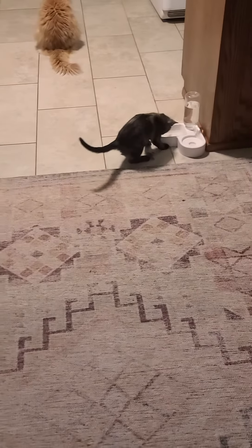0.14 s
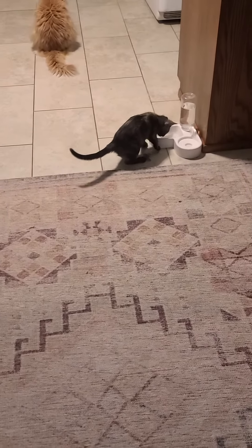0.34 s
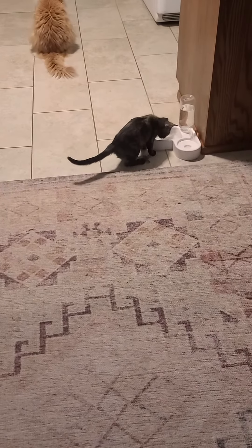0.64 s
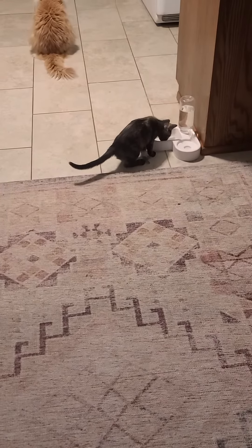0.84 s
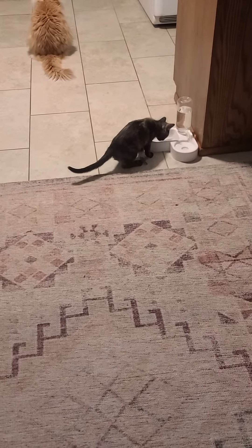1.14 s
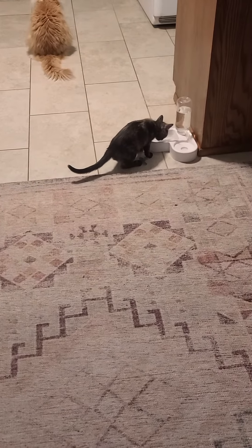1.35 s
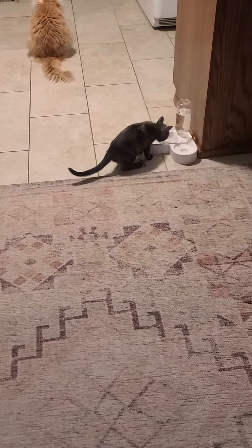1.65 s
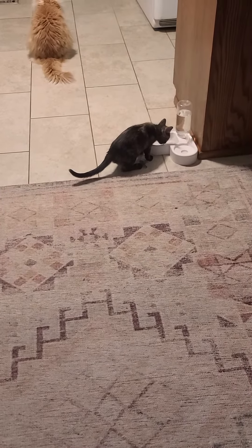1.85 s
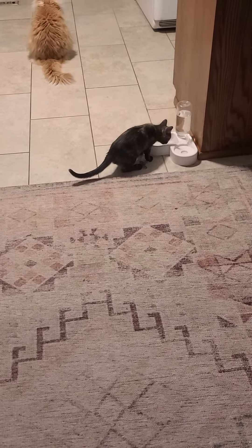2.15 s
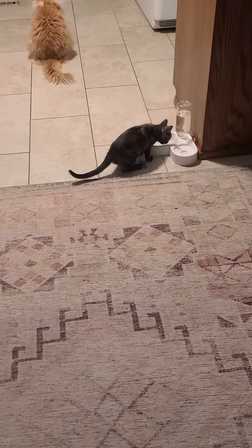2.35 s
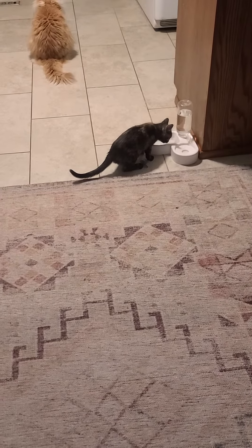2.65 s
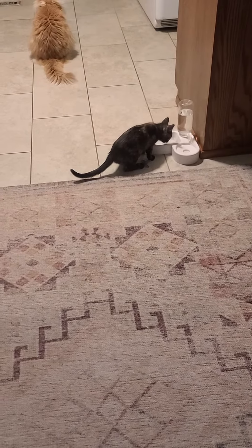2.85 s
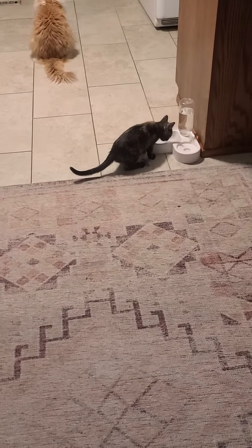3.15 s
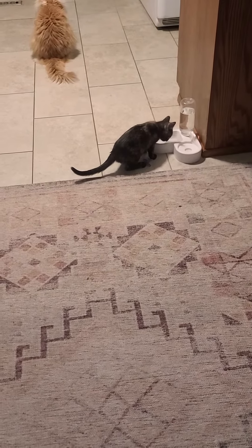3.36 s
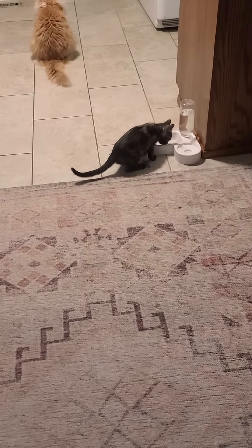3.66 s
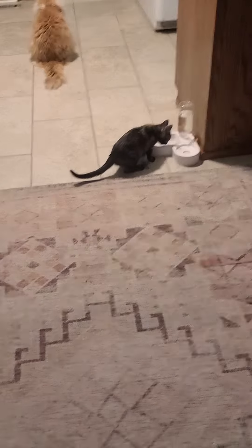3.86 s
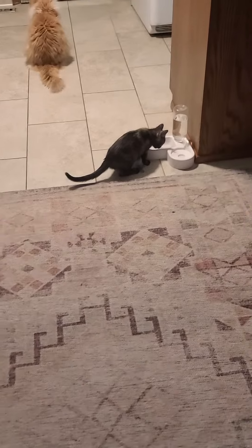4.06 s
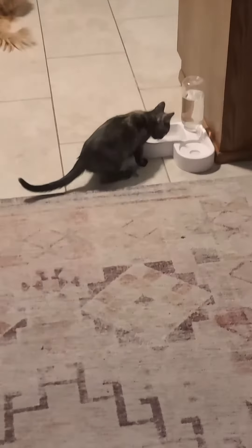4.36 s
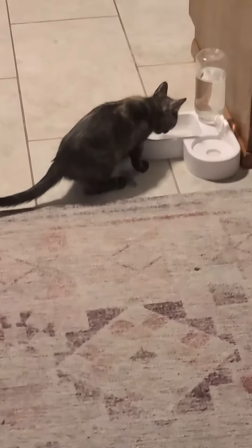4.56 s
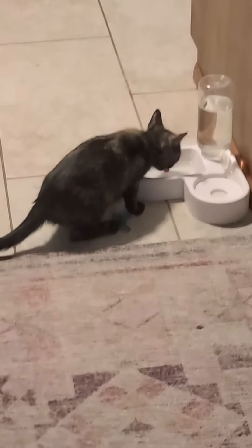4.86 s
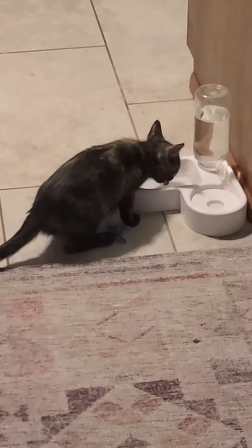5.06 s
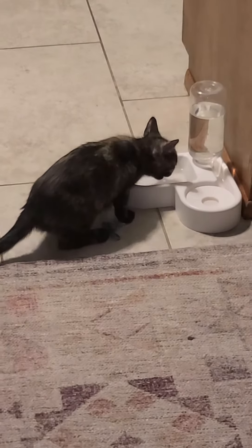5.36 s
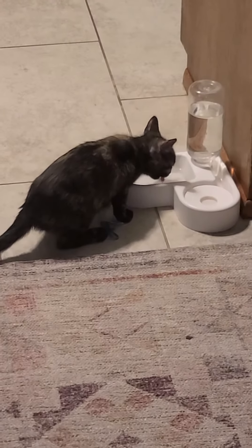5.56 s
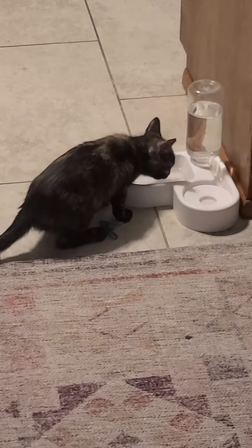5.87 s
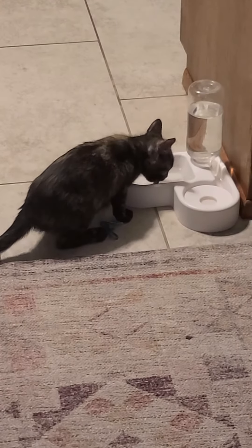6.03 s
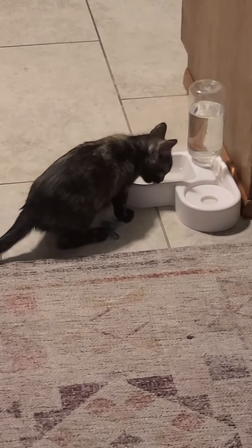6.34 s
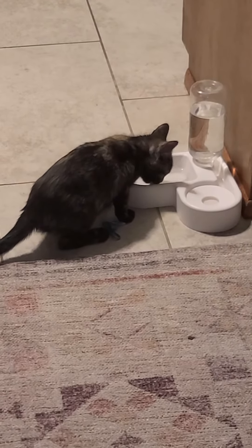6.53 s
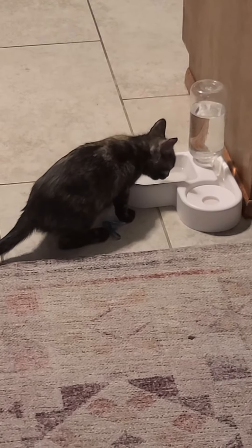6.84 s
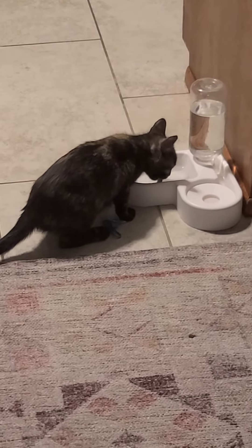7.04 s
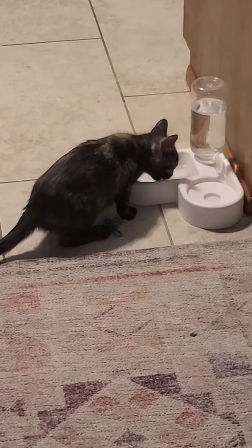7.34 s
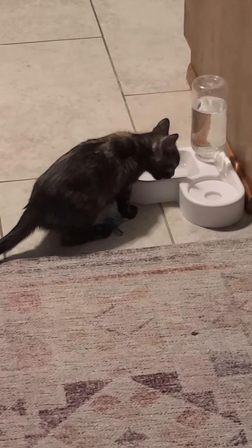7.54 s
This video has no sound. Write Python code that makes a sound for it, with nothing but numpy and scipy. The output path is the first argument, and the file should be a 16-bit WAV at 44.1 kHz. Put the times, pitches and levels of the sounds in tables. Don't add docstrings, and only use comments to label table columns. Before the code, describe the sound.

A handheld stereo microphone catches a deep, slightly fluttering appliance drone, at first subdued. Tiny distant scratches come from a kitten at a plastic bowl. Just before four seconds a finger taps and slides on the casing beside the right microphone, with cloth brushes and low grip rubbing, then one hard knock. The drone rises as this happens, and sparse light bowl rustles continue until the end.

```python
import sys
import numpy as np
from scipy import signal
from scipy.fft import rfft, irfft, next_fast_len
from scipy.io import wavfile

SR = 44100
rng = np.random.default_rng(int(sys.argv[2]) if len(sys.argv) > 2 else 0)


def store_wav(level_fs):
    pcm = np.round(np.clip(np.atleast_2d(level_fs), -1, 1) * 32767)
    wavfile.write(sys.argv[1], SR, pcm.T.astype(np.int16))


def attenuation_scalar(level_db):
    decades = np.asarray(level_db, float) / 20
    return 10 ** decades


N = 339549


def drift(rate):
    hop, warm_up = 40, 2000
    pole = np.exp(-2 * hop * np.pi * rate / SR)
    noise = rng.standard_normal(N // hop + warm_up + 2)
    slow = signal.lfilter([1], [1, -2 * pole, pole * pole], noise)[warm_up:]
    return np.interp(np.arange(N) / hop, np.arange(len(slow)), slow / slow.std())


def butter(x, hz, kind, order=2):
    return signal.sosfilt(signal.butter(order, hz, kind, fs=SR, output="sos"), x)


def add(out, s, sound):
    i = round(s * SR)
    out[:, i:i + sound.shape[1]] += sound[:, :N - i]


def ramp(s, length_s):
    return np.clip((np.arange(N) / SR - s) / length_s, 0, 1)


def even_power(spread_db):
    return spread_db ** 2 * np.log(10) / 20


def motor(orders, turns, flutter_db, flutter_rate, tilt_db=0):
    shakes_per_s = 18
    out = np.zeros((2, N))
    for multiple, left_db, right_db, lead, *extra in orders:
        shake_db = sum(extra)
        phase = 2 * np.pi * (np.round(multiple) * turns + rng.random())
        level_db = flutter_db * drift(flutter_rate) + tilt_db * np.log2(multiple)
        level_db += shake_db * drift(shakes_per_s) - even_power(shake_db)
        left = attenuation_scalar(left_db) * np.sin(phase)
        right = attenuation_scalar(right_db) * np.sin(phase + lead)
        out += np.sqrt(2) * attenuation_scalar(level_db) * np.array([left, right])
    return out


def compressor():
    # (multiple, left level [dB rms], right level [dB rms], right lead [rad])
    orders = [(1, -53.9, -54.0, 0.1), (2, -66, -66, 0), (3, -59.5, -57.7, 0.1), (4, -59.5, -59, 0.1),
              (5, -66, -60, 0.2), (6, -61.2, -63.0, -1.5), (7, -57.6, -55.2, 0.0), (8, -65, -62.5, -0.8),
              (9, -74.2, -57.9, -2.2), (10, -76, -70, 0), (11, -65.8, -66.8, 2.9), (12, -68.7, -65.7, -1.4),
              (13, -77.3, -72.3, -2.6), (15, -89.9, -71.8, -2.1), (16, -80.4, -70.5, 2.2),
              (17, -77.0, -75.4, 2.6), (20, -76, -77, 1.4), (22, -80.9, -77.8, -1.7),
              (29, -73.6, -93.1, -1.5), (33, -82, -82.5, 0.1), (44, -86, -86, 0), (54, -86, -85, 0),
              (62, -85, -83, -2.3), (77, -82, -94, 2.8), (14, -80, -73, 1), (21, -86, -81, -1),
              (23, -86, -81, 2), (26, -88, -84, 0), (48, -92, -88, 1), (49, -92, -89, -2),
              (71, -96, -91, 1), (74, -95, -93, 0)]
    crank_hz = 59.17 + 0.09 * drift(1.5)
    return motor(orders, np.cumsum(crank_hz) / SR, flutter_db=1.8, flutter_rate=8, tilt_db=-0.01)


def fan():
    # (multiple, left level [dB rms], right level [dB rms], right lead [rad], shake [dB])
    orders = [(1, -61.5, -61, 0.32, 0), (2, -37.7, -36.7, -0.11, 0), (3, -56.5, -56.5, -0.033, 3),
              (4, -53.5, -51, -0.75, 1.3)]
    rotation_hz = 81.0 + 0.2 * drift(5.8)
    swell = attenuation_scalar(0.35 * drift(0.81))
    return swell * motor(orders, np.cumsum(rotation_hz) / SR, flutter_db=0.7, flutter_rate=9)


def patchy(spectrum, size):
    fine_from_hz = 1000
    dip_from_hz, dip_to_hz = 7600, 10700
    coarse = np.geomspace(220, fine_from_hz, 4)[:-1]
    fine = np.arange(fine_from_hz, dip_from_hz - 200, 330)
    starts = np.r_[0, coarse, fine, np.linspace(dip_from_hz, dip_to_hz, 8)]
    edges = [round(hz * size / SR) for hz in starts] + [size]
    out = 0
    for hz, low, high in zip(starts, edges, edges[1:]):
        if hz < fine_from_hz:
            flicker_db, chance = 0.85, drift(8)
        else:
            flicker_db, rate = (2, 13) if hz >= dip_from_hz else (2.5, 12)
            if hz >= dip_to_hz:
                flicker_db = 0.4
            chance = np.array([drift(rate), drift(rate)])
        band = np.zeros_like(spectrum)
        band[:, low:high] = spectrum[:, low:high]
        out = out + irfft(band, size)[:, :N] * attenuation_scalar(flicker_db * chance - even_power(flicker_db))
    return out * attenuation_scalar(0.7 * drift(6))


def room_noise():
    # (frequency [Hz], left density
    # [dB per Hz], right density [dB per Hz])
    room_colour = [(26.4, -66, -75), (40, -72, -73), (70, -70.5, -72.5), (108, -73.5, -71.5), (134, -75, -73.5),
                   (218, -74, -73.5), (242, -75.5, -71.5), (248, -70.5, -71.5), (340, -77, -74),
                   (420, -81.5, -75), (606, -86, -81), (980, -89, -85), (1240, -93, -92), (1700, -94, -95.5),
                   (2060, -102.6, -99.5), (2520, -101.0, -96), (3800, -105.2, -101.4), (4520, -102.0, -104.9),
           (6120, -107.8, -114.4), (6080, -99.5, -109.0), (6630, -94.5, -110.6), (7330, -104, -118),
           (7430, -107, -130), (7870, -115.5, -139), (9000, -119, -123), (9900, -130, -121),
           (11000, -118.6, -113.1), (13100, -113.7, -115.0), (15400, -118.1, -118.0)]
    # (centre [Hz], width [Hz], left level [dB], right level [dB])
    ripples = [(830, 19, -2.5, -0.5), (1495, 94, -3.5, -2.5), (1010, 250, -2.5, -0.5), (795, 78, -1, -1.5),
               (1170, 190, -1, -0.5), (4180, 47, 3, 5.5), (4400, 150, 0, 1), (6170, 89, 2.5, 4.5),
               (6540, 260, -2, -3.5), (8350, 230, 2.5, -3.5), (14700, 1100, -1, 3), (2000, 310, 0.5, 0.5),
               (3200, 60, 4.5, -4), (4077, 100, -2, -8.5), (4350, 210, -6.5, -5.5), (5060, 140, 0.5, -1.5),
               (5850, 150, 0.5, -8.5), (5900, 91, 4, 2), (7600, 190, -1.5, -8.5), (9940, 320, -7.5, 1.5),
               (10900, 64, -3.5, 4.5)]
    # (frequency [Hz], left-right correlation [-1 to 1])
    likeness = [(30, 0.91), (90, 1), (150, .93), (240, 0.94), (330, .65), (500, 0.62), (770, -0.26),
                (1500, -0.019), (16000, -0.054)]
    size = next_fast_len(N)
    every_hz = np.maximum(np.arange(size // 2 + 1) * SR / size, 1)
    log_hz = np.log(every_hz)
    hz, left_db, right_db = np.transpose([(11, -95.0, -93.5)] + room_colour)
    colour_db = np.array([np.interp(log_hz, np.log(hz), side_db) for side_db in (left_db, right_db)])
    for centre_hz, width, *side_db in ripples:
        colour_db += np.outer(side_db, np.exp(-((every_hz - centre_hz) / width) ** 2))
    knots = np.arange(0, SR / 2 + 70, 70)
    combs = rng.standard_normal((2, len(knots)))
    colour_db += [0.8 * np.interp(every_hz, knots, comb) * (every_hz > 700) for comb in combs]
    like_hz, like = np.transpose(likeness)
    alike = np.clip(np.interp(log_hz, np.log(like_hz), like), -1, 1)
    mid, side = rfft(rng.standard_normal((2, size)))
    pair = np.sqrt(1 + alike) * mid + np.sqrt(1 - alike) * side * [[1], [-1]]
    return patchy(pair * attenuation_scalar(colour_db) * np.sqrt(SR) / 2, size)


def gains_db():
    climb_from_s, climb_s = 3.98, 0.36
    t = np.arange(N) / SR
    climb = ramp(climb_from_s, climb_s)
    overshoot_db = 0.3 * climb * np.exp(-np.maximum(t - climb_from_s - climb_s, 0) / 0.27)
    gain = -6.5 * (1 - climb) + overshoot_db
    switch_on = 6.5 * np.exp(-t / 0.05)
    opened = 8.5 * ramp(3.75, 0.039) * (1 - climb)
    return gain - switch_on - 1.5, gain + switch_on, gain + opened - 0.5


def automatic_gain(steady):
    bass_hz, treble_hz = 112, 5360
    bass_db, middle_db, treble_db = gains_db()
    size = next_fast_len(N)
    hz = np.arange(size // 2 + 1) * SR / size
    spectrum = rfft(steady, size)
    bass = irfft(spectrum / (1 + (hz / bass_hz) ** 8), size)[:, :N]
    treble = irfft(spectrum / (1 + (treble_hz / (hz + 1)) ** 8), size)[:, :N]
    middle = steady - bass - treble
    return attenuation_scalar(bass_db) * bass + attenuation_scalar(middle_db) * middle + attenuation_scalar(treble_db) * treble


def bumps():
    # (time [s], peak [dB], push +1 or lift -1, contact [ms])
    touches = [(0.8615, -44, 1, 1.3), (1.4125, -43, 1, 1.3), (2.4615, -43, 1, 1.3), (6.1955, -37, 1, 1.3),
               (2.635, -44, -1, 6), (2.924, -41, -1, 6.4), (3.642, -48, 1, 1.6), (3.687, -42, 1, 2.6),
               (3.728, -46, 1, 5), (3.7686, -28, 1, 2.2), (3.8896, -18, -1, 1.55), (3.8907, -22, 1, 3.4),
               (3.8985, -31, 1, 3), (4.4093, -21, 1, 1.5), (4.4097, -21.5, 1, .55), (4.4125, -32, 1, 2.5),
               (3.949, -38, 1, 2.3), (4.207, -34, 1, 2.2), (4.69, -41, -1, 9), (4.734, -37, -1, 4.7),
               (4.796, -41, 1, 7.2), (4.951, -53, 1, 3.6), (5.732, -33, -1, 5.1), (7.015, -41, 1, 1.9),
               (7.601, -26, -1, 7.3)]
    out = np.zeros((2, N))
    for s, db, sign, ms in touches:
        rebound = 2 * np.pi * 125 / (1 + ms / 4.5)
        pulse = np.zeros(3000)
        contact = np.hanning(int(ms * SR / 1000) + 2)
        pulse[:len(contact)] = contact
        vent = signal.bilinear([1, 0, 0], [1, 1.1 * rebound, rebound ** 2], SR)
        near = signal.lfilter(*vent, pulse)
        near *= sign * attenuation_scalar(db) / np.abs(near).max()
        far = np.roll(butter(near, 740, "low"), round(0.0008 * SR))
        add(out, s, np.array([attenuation_scalar(-15) * far, near]))
    return out


def case_echoes(x):
    # (delay [ms], level [dB])
    returns = [(1.3, -17), (3.4, -14), (5.1, -19), (7.4, -21), (11, -26)]
    thin = butter(x, [900, 3600], "band")
    out = x
    for k, (ms, db) in enumerate(returns):
        out = out + (-1) ** k * attenuation_scalar(db) * np.roll(thin, round(ms * SR / 1000), axis=1)
    return out


def scratches(rows, pan_db, spread):
    out, t = np.zeros((2, N)), np.arange(6000) / SR
    side_db = pan_db * np.array([[0.5], [-0.5]])
    grit = rng.standard_normal((len(rows), 2, 6000))
    for (s, db, hz, ms), noise in zip(rows, grit):
        swell = t * 1000 / ms
        tail = 0.3 * np.exp(-t / 0.04)
        shape = (1 - np.exp(-swell * 5)) * (np.exp(-swell ** 2) + tail)
        band = butter(noise, [hz / spread, hz * spread], "band", order=3)
        if hz < 8000:
            band = butter(band, 7500, "low", order=8)
        add(out, s, attenuation_scalar(db + side_db) * shape * band / band.std())
    return out


def bowl_rustles():
    # (time [s], level [dB rms], centre [Hz], length [ms])
    rows = [(.96, -73, 3500, 15), (1.12, -74, 3500, 30), (1.413, -78, 11500, 10), (1.5, -75, 2700, 200),
            (2.086, -73, 3000, 15), (3.12, -75, 6700, 40), (4.66, -68, 3500, 15), (4.74, -68, 3500, 15),
            (5.197, -66, 2800, 25), (5.198, -66, 3250, 25), (5.196, -67, 5500, 8), (5.41, -69, 4500, 20),
            (5.412, -69, 4150, 35), (5.865, -69, 3500, 15), (6.65, -63, 6500, 50), (6.655, -70, 4200, 12),
            (7.17, -71, 4600, 90), (7.218, -66, 4500, 35), (7.44, -67, 4500, 20)]
    return scratches(rows, pan_db=3.5, spread=1.07)


def grip():
    # (start [s], strength [dB], decay time [s])
    shifts = [
        (3.58, -49, 0.86),
        (4.2, -41, 0.32),
        (4.6, -45, .3),
    ]
    attack_s, resting_db = 0.05, -58
    t = np.arange(N) / SR
    rub = butter(rng.standard_normal(N), [35, 130], "band") * attenuation_scalar(1.9 * drift(34))
    press = attenuation_scalar(resting_db) * ramp(shifts[0][0], attack_s)
    for s, db, fade_s in shifts:
        fade = np.exp(-np.maximum(t - s, 0) / fade_s)
        press = np.maximum(press, attenuation_scalar(db) * ramp(s, attack_s) * fade)
    return press * rub / rub.std() * attenuation_scalar(np.array([[-18], [0]]))


def sleeve_brushes():
    # (time [s], level [dB rms], centre [Hz], length [ms])
    rows = [(3.632, -73, 2300, 16), (3.756, -73, 6300, 10), (3.758, -74, 2400, 10), (3.797, -64, 1050, 14),
            (3.8, -77, 6500, 14), (3.858, -75, 6800, 14), (3.881, -69, 3500, 16), (3.897, -75, 6600, 10),
            (4.404, -58, 1200, 12), (4.398, -64, 2600, 14), (4.4, -70, 6600, 10), (4.401, -71, 4800, 10),
            (4.411, -62, 1500, 8), (4.411, -67, 2600, 8), (4.412, -69, 6900, 6)]
    return scratches(rows, pan_db=-17, spread=1.2)


def ticks():
    # (time [s], level [dB, the ring peaks about 6 dB lower], ring [Hz])
    slips = [(3.6402, -38, 1000), (3.6422, -40, 1050), (3.6405, -45, 3000), (3.641, -48, 1900),
             (3.6428, -51, 3000), (3.6395, -55, 4700), (3.688, -60, 6900), (3.7618, -54, 6600),
             (3.7622, -45, 2000), (3.803, -48, 1600), (3.803, -43, 1000), (3.7684, -35, 1900),
             (3.7684, -37, 2900), (3.7684, -38, 4950), (3.7702, -49, 5000), (3.772, -50, 3200),
             (3.7682, -41, 6500), (3.7686, -55, 8500), (3.8886, -34, 4130), (3.8888, -38, 3100),
             (3.8888, -38, 2220), (3.8897, -32, 1350), (3.8892, -47, 6100), (3.8904, -50, 6500),
             (3.9, -49, 4600), (3.8795, -50, 4200), (4.4094, -25.5, 6800), (4.4091, -30, 5000),
             (4.4093, -23, 2800), (4.4091, -32, 4300), (4.4093, -32, 5900), (4.4094, -49, 8800),
             (4.4093, -29, 1700), (3.8657, -39, 3040), (3.8657, -46, 4400), (3.8657, -46, 1500),
             (3.8657, -44, 7200), (3.8684, -43, 7000), (3.8684, -49, 2600), (3.8686, -50, 4300),
             (3.9, -50, 6600), (3.9076, -48, 3580), (3.9458, -40, 4100), (3.9456, -45, 2200),
             (3.9455, -44, 1500), (3.9458, -45, 6600), (3.9662, -46, 3300), (3.9662, -47, 4600),
             (3.9663, -42, 6900), (3.9697, -44, 4400), (3.9697, -47, 2800), (3.9698, -45, 6900),
             (3.9972, -48, 2900), (3.9971, -47, 4000), (3.9973, -47, 7000)]
    # (time [s], peak [dB])
    cracks = [
        (3.7688, -52),
        (3.8662, -58),
        (3.8888, -51),
        (3.9462, -45),
        (3.9666, -48),
        (3.9702, -45),
        (3.9976, -48),
        (4.4098, -48),
    ]
    out, t = np.zeros((2, N)), np.arange(300) / SR
    attack_s, t60_s = 0.0003, 0.003
    shape = (1 - np.exp(-t / attack_s)) ** 2 * attenuation_scalar(-60 * t / t60_s)
    shape = 0.5 * shape / shape.max()
    sounds = []
    for k, (s, db, hz) in enumerate(slips):
        sounds.append((s, (-1) ** k * attenuation_scalar(db) * shape * np.sin(2 * np.pi * hz * t)))
    grit = rng.standard_normal((len(cracks), 300))
    for (s, db), noise in zip(cracks, grit):
        spit = butter(noise * np.exp(-t / 0.0003), 10300, "high", order=4)
        sounds.append((s, attenuation_scalar(db) * spit / np.abs(spit).max()))
    for s, near in sounds:
        far = attenuation_scalar(-26) * np.roll(near, round(0.0004 * SR))
        add(out, s, np.array([far, near]))
    return out


def scuffs():
    # (time [s], level [dB rms], centre [Hz], length [ms])
    rows = [
        (5.185, -73, 6800, 25),
        (6.745, -72, 6700, 20),
        (6.89, -72, 6600, 30),
        (7.05, -72, 6750, 40),
        (7.23, -73, 6700, 50),
    ]
    return scratches(rows, pan_db=15, spread=1.07)


def scene():
    raised = automatic_gain(compressor() + fan() + room_noise())
    touches = case_echoes(bumps() + ticks())
    return raised + touches + bowl_rustles() + grip() + sleeve_brushes() + scuffs()


def low_pass(x):
    return signal.sosfilt(signal.butter(12, 15750, fs=SR, output="sos"), x)


def record(dry):
    fade = np.minimum(np.arange(N)[::-1] / (0.002 * SR), 1)
    return low_pass(dry * fade)


dry = scene()
out = record(dry)
store_wav(out)
```